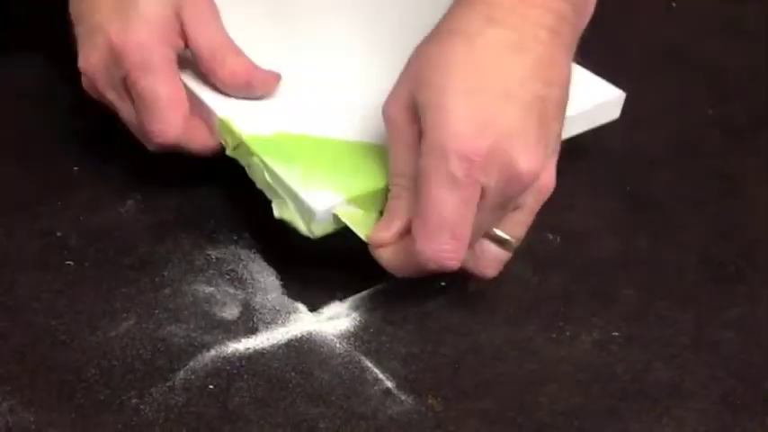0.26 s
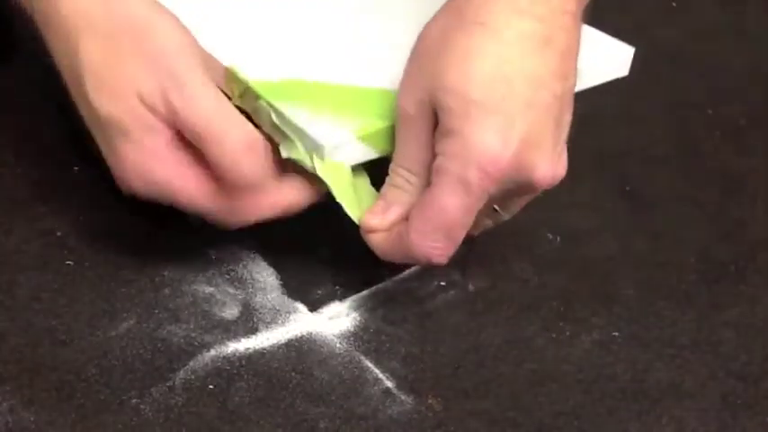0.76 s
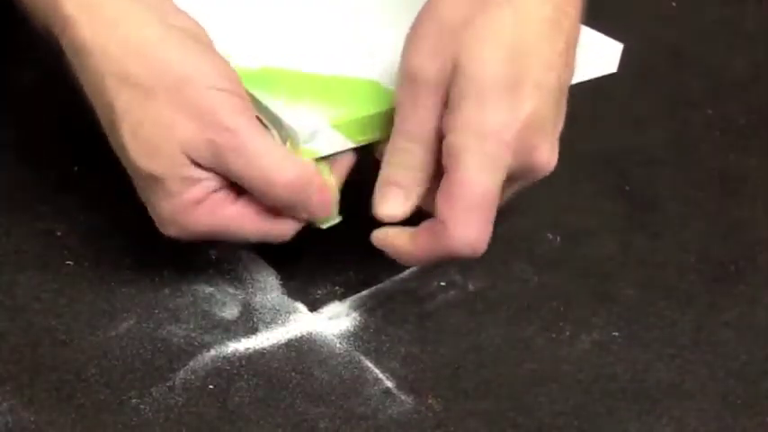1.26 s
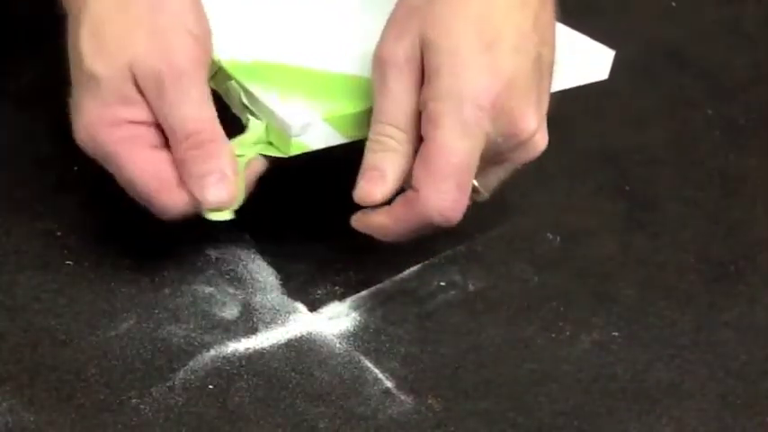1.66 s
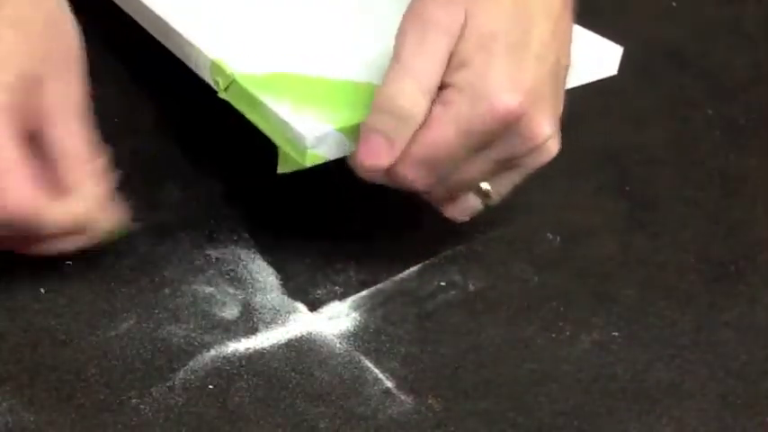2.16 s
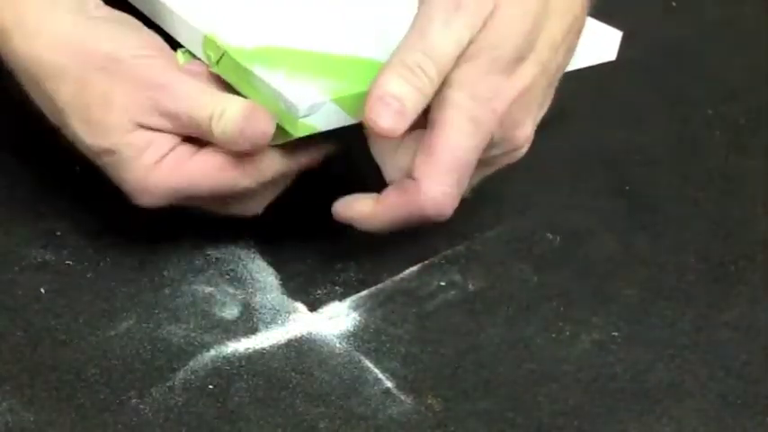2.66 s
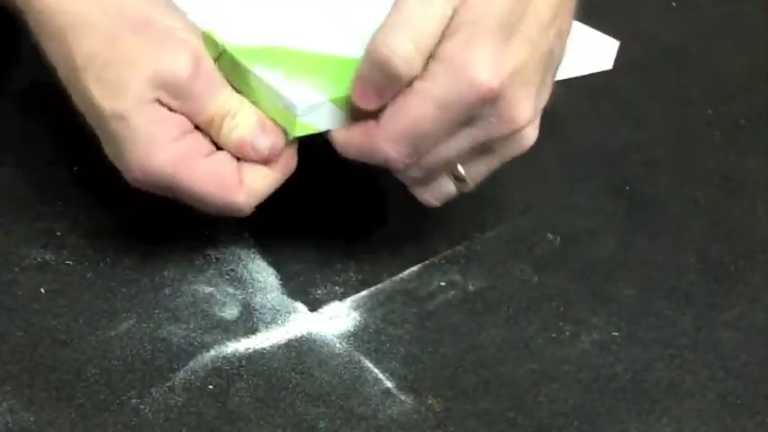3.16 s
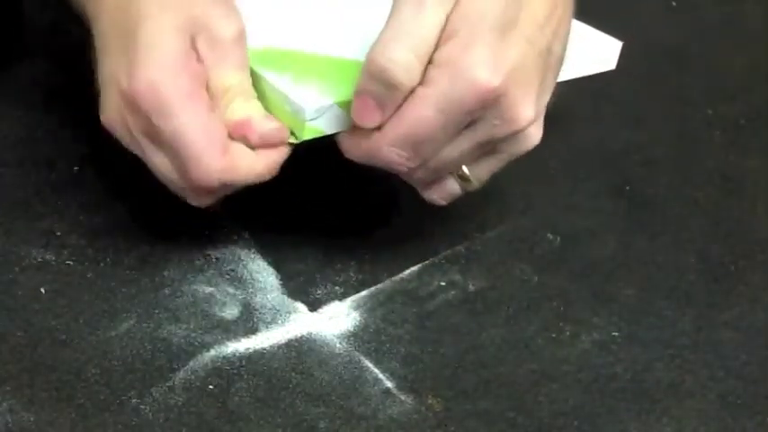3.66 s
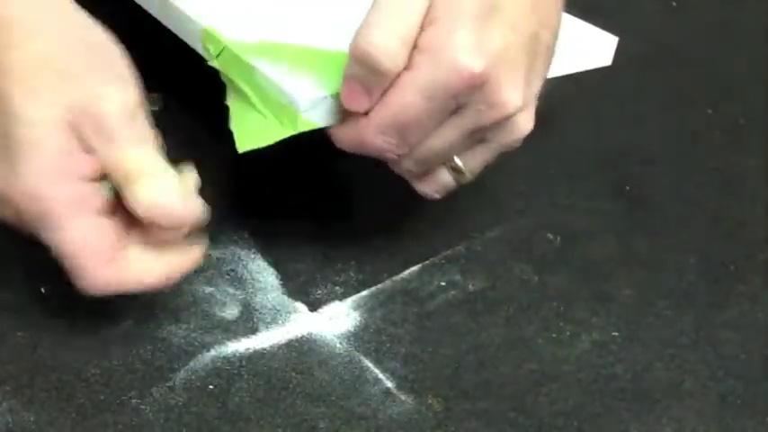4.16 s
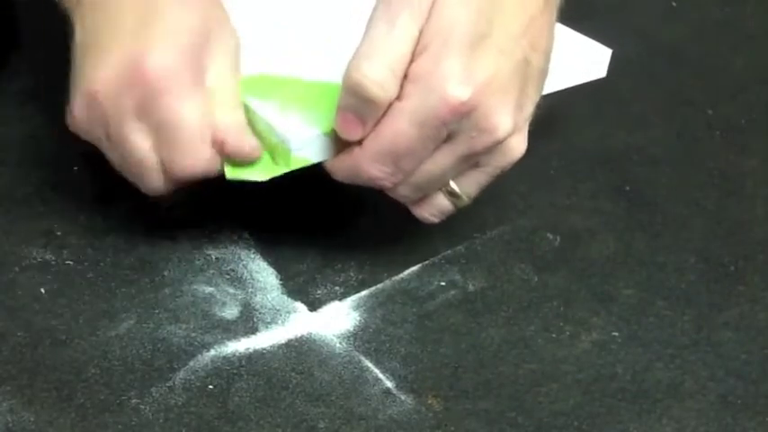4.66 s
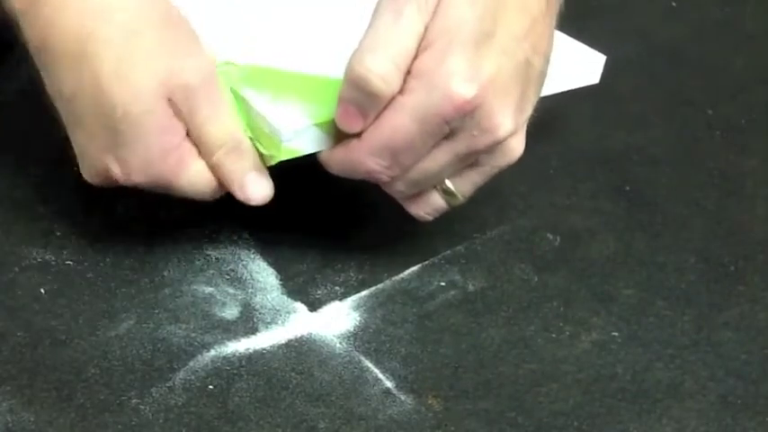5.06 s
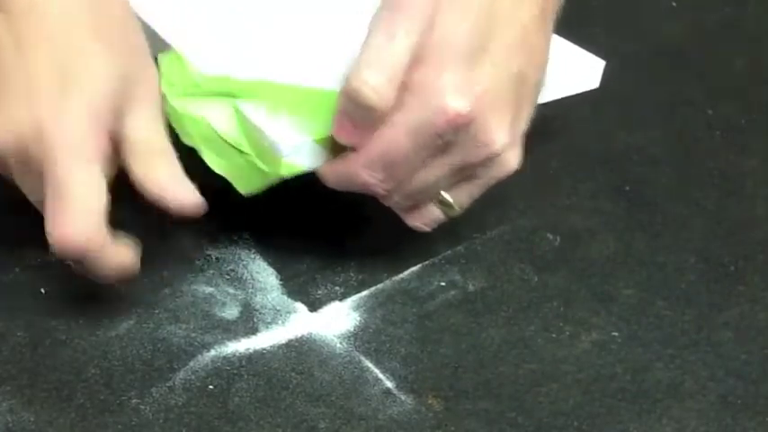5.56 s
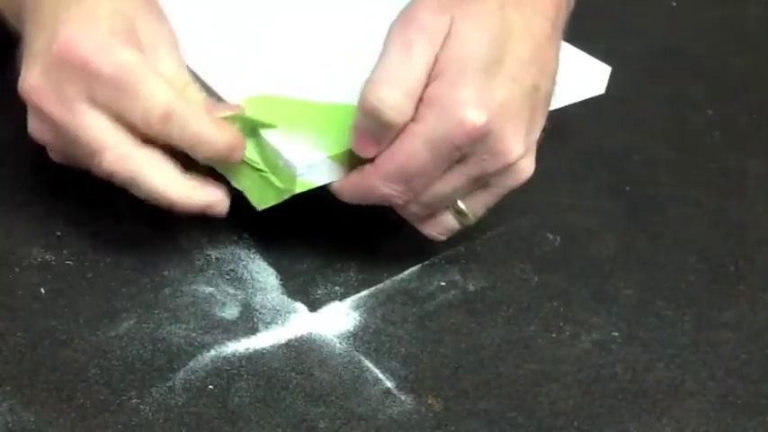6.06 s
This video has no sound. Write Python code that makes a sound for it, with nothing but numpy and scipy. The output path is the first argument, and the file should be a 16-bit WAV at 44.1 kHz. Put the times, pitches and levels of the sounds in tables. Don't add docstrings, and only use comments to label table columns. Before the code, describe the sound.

Close, crisp tape tearing: one bright rip, then clusters of hard snapping cracks thinning to soft crackle, over quiet workshop hum.

```python
import sys
import numpy as np
from scipy import signal
from scipy.fft import rfft, irfft
from scipy.io import wavfile
from scipy.ndimage import uniform_filter1d

SR = 44100
rng = np.random.default_rng(int(sys.argv[2]) if len(sys.argv) > 2 else 0)


def wav_record(signal):
    frames = np.transpose(np.atleast_2d(signal))
    bounded = np.clip(frames, -1, 1)
    quanta = np.round(bounded * 32767).astype(np.int16)
    wavfile.write(sys.argv[1], SR, quanta)


def field_ratio(decibels):
    return 10 ** (np.asarray(decibels, dtype=float) / 20)


N = 278712
FADE_DB = 20.0


def evened(x):
    return x / np.sqrt(np.mean(x ** 2) + 1e-20)


def unit(x):
    return x / np.linalg.norm(x)


def read(points, hz):
    f, value = np.transpose(points)
    return np.interp(np.log(hz + 1), np.log(f + 1), value)


def add(mix, s, sound):
    part = mix[max(round(s * SR), 0):][:len(sound)]
    part += sound[:len(part)]


def coloured(x, points):
    gain = field_ratio(read(points, np.fft.rfftfreq(len(x), 1 / SR)))
    return evened(irfft(rfft(x) * gain, len(x)))


def causal(x, points):
    log_gain = np.log(field_ratio(read(points, abs(np.fft.fftfreq(4096, 1 / SR)))))
    response = np.fft.ifft(np.exp(np.conj(signal.hilbert(log_gain)))).real[:2048]
    return signal.oaconvolve(x, response)[:N]


def band(x, lo_hz, hi_hz):
    edges_hz = [lo_hz, min(hi_hz, SR / 2 - 99)]
    return signal.sosfilt(signal.butter(2, edges_hz, "band", fs=SR, output="sos"), x)


def ring(hz, db, t60, size):
    t = np.arange(size) / SR
    return field_ratio(db - 60 * t / t60) * np.sin(2 * np.pi * hz * t)


def crackle(per_s, spread_db):
    size = field_ratio(spread_db * np.minimum(rng.exponential(1, N), 4))
    breaks = rng.random(N) < per_s / SR
    return size * breaks * rng.standard_normal(N)


def background():
    # frequency in Hz, level in dB per Hz
    air = [(18, -63.5), (30, -75), (184, -2.5), (632, -4.5), (1010, -11.5), (1430, -8), (1630, -10.5),
           (2120, -15.5), (3870, -14), (4420, -18), (14400, -20), (16000, -19.5)]
    # frequency in Hz, width in Hz, level in dB
    fan = [
        (124, 17.6, -69),
        (191.3, 12, -68.5),
        (321.5, 4.8, -73.5),
        (967, 23, -75),
    ]
    hz = np.fft.rfftfreq(N, 1 / SR)
    tones = []
    for f, width_hz, db in fan:
        fuzzy = rfft(rng.standard_normal(N)) / (1 + (2 * (hz - f) / width_hz) ** 2)
        tones.append(field_ratio(db) * evened(irfft(fuzzy, N)))
    rumble = band(rng.standard_normal(N), 7.6, 43)
    return field_ratio(-63) * coloured(rng.standard_normal(N), air) + sum(tones) + field_ratio(-68.0) * evened(rumble)


def strokes():
    # firmest grip in seconds, level in dB, rise in seconds,
    # fall in seconds, brightness in dB
    rubs = [(0.03, -50.5, .4, 0.18, -9), (0.123, -44, 0.074, 0.061, -4.5), (0.29, -51.5, 0.54, 0.28, -8),
            (0.652, -43.5, 0.16, 0.086, -5), (0.902, -45, 0.044, 0.21, -4),
            (0.94, -48.5, 0.077, 0.089, -15), (1.236, -48.5, 0.073, 0.075, 2), (1.3, -56, 0.21, 0.16, 23),
            (1.59, -55, .03, 0.091, -15), (1.63, -49.5, 0.13, 0.016, 3.5), (3.56, -50, 0.043, 0.043, -12),
            (2.275, -51, 0.044, 0.049, -3), (2.385, -44, 0.07, 0.11, -4), (2.468, -42.5, 0.03, 0.041, -7),
            (2.6, -63, 0.072, .08, 9), (2.673, -50, 0.077, 0.035, -10.5), (2.8, -49, 0.087, 0.038, -2.5),
            (2.99, -66, 1.2, .03, -22), (3.194, -54, 0.17, 0.089, -15), (4.484, -48.5, 0.062, 0.015, -6),
            (4.591, -47.5, 0.11, 0.033, -6), (5.161, -46, 0.06, 0.04, 0), (5.8, -70.5, 2.1, 0.47, -29)]
    # hardest pull in seconds, level in dB, rise in seconds,
    # fall in seconds, brightness in dB
    pulls = [(0.43, -42.5, 0.05, 0.2, -9), (1.418, -27, 0.051, 0.045, -2.5), (1.76, -40, 0.025, .06, -4),
             (1.793, -17, 0.028, 0.045, 0), (1.835, -40, 0.082, 0.019, -13.5),
             (1.905, -46.5, 0.027, 0.091, -2), (0.485, -36.5, 0.082, 0.05, 1), (3.604, -45, .006, .08, -8),
             (2.132, -42, 0.045, 0.06, -4), (3.33, -39.5, 0.044, 0.21, -5.5),
             (3.619, -39.5, 0.016, 0.26, -7), (4.032, -40.5, 0.053, 0.096, -8),
             (4.27, -44, 0.0061, 0.097, -12), (4.716, -46, 0.055, 0.26, 3.5),
             (5.085, -43, 0.052, 0.051, -11), (5.33, -35, 0.025, 0.097, -11.5),
             (5.379, -40.5, 0.09, 0.067, 2), (5.5, -38.5, 0.042, 0.03, 4),
             (6.085, -39.5, 0.093, 0.33, -1.5), (6.199, -43, 0.13, 0.2, -7), (6.32, -51.5, 0.45, .5, -7)]
    t = np.arange(0, N + 64, 64)[:, None] / SR
    s, db, rise, fall, bright_db = np.transpose(rubs + pulls)
    fade = FADE_DB * np.maximum((s - t) / rise, (t - s) / fall)
    power = field_ratio(db - fade) ** 2 + 1e-30
    total = power.sum(1)
    brightness = power @ bright_db / total
    return [np.interp(np.arange(N) / SR, t[:, 0], v) for v in (np.sqrt(total), brightness)]


def rubbing():
    # frequency in Hz, level in dB per Hz
    paper_colour = [(300, -24.5), (900, -14), (1500, -17.5), (2200, -12.5), (3000, -9), (4000, -5.5),
                    (6700, -4.5), (9000, -5), (14700, -7.5), (16000, 1)]
    level, bright_db = strokes()
    bright = field_ratio(bright_db / 2)
    grip = field_ratio(2.4 * evened(uniform_filter1d(rng.standard_normal(N), 300)))
    paper = coloured(crackle(per_s=13000, spread_db=2.0) * grip, paper_colour)
    dull = signal.sosfiltfilt(signal.butter(2, 4300, fs=SR, output="sos"), paper)
    cup = field_ratio(-10.5) * band(paper, 1840, 3400) / bright ** 2
    return level * (dull / bright + (paper - dull) * bright + cup)


def board():
    # time in seconds, level in dB
    scrape = [(0.0, -54), (0.09, -49.5), (0.46, -59), (1.69, -60.5), (1.92, -76), (2.36, -71), (3.1, -57),
              (3.4, -55.5), (3.57, -67), (4.1, -64), (4.28, -68), (4.72, -62), (5.14, -83), (5.44, -61),
              (6.32, -59)]
    # frequency in Hz, level in dB per Hz
    bench_colour = [(60, -43), (130, -8.5), (300, -10.5), (600, -15), (1000, -10), (1800, -19),
                    (4000, -31.5)]
    # start in seconds, peak in dB, pitch in Hz, t60 in seconds
    knocks = [(0.009, -43, 175, 0.036), (0.173, -33, 463, 0.1), (0.189, -45.5, 553, 0.53),
              (1.872, -37.5, 970, 0.024), (2.617, -41, 626, 0.075), (3.335, -37.5, 950, 0.094),
              (4.29, -33, 640, 0.18), (4.327, -35.5, 844, 0.054), (4.337, -29.5, 265, 0.037),
              (4.36, -39, 560, 0.1), (6.076, -39, 840, 0.088)]
    # start in seconds, peak in dB, pitch in Hz, t60 in seconds
    thumps = [
        (1.386, -41, 124, 0.21),
        (3.334, -39.5, 190, 0.12),
        (4.678, -50, 120, 0.15),
        (4.743, -46.5, 135, 0.21),
        (0.174, -42, 160, .15),
        (3.622, -44, 180, .12),
        (2.1, -52.5, 110, 0.11),
    ]
    s, db = np.transpose(scrape)
    scrape_level = field_ratio(np.interp(np.arange(N) / SR, s, db) - 4)
    out = scrape_level * coloured(crackle(per_s=770, spread_db=1.5), bench_colour)
    t = np.arange(6000) / SR
    blows = knocks + thumps
    chance = rng.standard_normal((len(blows), 6000))
    for (s, db, hz, t60), noise in zip(blows, chance):
        thud = band(noise * field_ratio(-60 * t / t60), hz * 0.46, hz * 1.89)
        add(out, s, field_ratio(db) * thud / abs(thud).max())
    return out


def releases():
    # start in seconds, energy in dB,
    # ring of the free strip in Hz, share into the board in dB, brightness in dB
    tape_snaps = [(3.2944, -14, 8500, -3, 3), (3.3348, -5, 9200, 3.5, -19), (3.4076, -14, 4750, -0.5, -1),
                  (3.6027, -18, 3120, -12, 4), (3.6218, 0, 4140, 14, 7), (3.6245, 1, 2570, 10.5, 0),
                  (3.682, 7.5, 4150, 2, -2), (3.7358, 3.5, 3840, 5.5, -16), (3.7376, 2.5, 3920, 11.5, 26),
                  (3.802, 7.5, 4160, -1.5, 10), (3.805, -0.5, 5712, -11, -4.5),
                  (4.0325, -9, 10200, 11.5, -23), (4.0565, -3.5, 3550, 16, -22),
                  (4.0584, -8.5, 5470, 10, -3), (4.268, -10, 2350, 15, -38), (4.275, -12.5, 1730, 20, -33),
                  (4.7373, -11.5, 2130, 19.5, -27), (4.7505, -6.5, 1980, 8, -5),
                  (4.753, -4.5, 10400, 11.5, 1), (4.9118, -3, 8800, 4.5, 7.5), (5.4975, -16, 3680, -3, -3),
                  (5.4997, -6, 5900, 8, -2), (5.5046, 5.5, 2810, 13, 2.5), (5.5071, -8, 4150, 7, -29),
                  (5.5591, -8, 3530, 5, -6.5),
                  (1.2438, -13.5, 9287, 2, -1), (3.007, -20, 11500, 7, 5), (3.043, -23.5, 11410, 2, 21),
             (3.107, -25, 10380, 11, 20), (3.2967, -19.5, 4830, 7, -19), (3.3509, -17.5, 11100, 0, -25),
             (3.4247, -22.5, 3520, 4, -0.5), (3.4317, -22.5, 3400, -10, 0), (3.731, -16, 10340, -10, 5),
             (4.062, -10, 2470, -9, -13), (4.7095, -18.5, 9430, 4, 9.5), (4.918, -22, 9600, -2, -3),
             (4.929, -11, 5500, 6, 4.5), (4.9551, -16.5, 9500, 7, -9), (4.963, -14.5, 2330, -1, -40),
             (5.053, -26, 4750, 13, -3), (5.086, -14, 3480, -1, -5), (5.1102, -13, 3200, -6, -3),
             (5.1204, -18, 8050, -23, -5), (5.4821, -11, 8700, -1, 1), (5.939, -26.5, 4330, 4, -26),
             (5.988, -24, 2700, 13, 0), (6.0421, -19.5, 10600, -11, 5)]
    # start in seconds, energy in dB, ring in Hz, board share
    # in dB
    small_gives = [(0.0055, -26, 6100, 20), (0.02, -36, 5500, -3), (0.032, -32, 5990, -3),
                   (0.125, -28, 4100, -5), (5.445, -33, 9000, -10), (0.647, -24.5, 3480, 13),
                   (1.237, -15.5, 9000, -14), (1.28, -30, 9350, -7), (1.311, -24, 7970, 1),
                   (1.615, -32, 5630, 8), (1.649, -27.5, 13780, 12), (2.3323, -28.5, 9800, -2),
                   (2.389, -20.5, 6000, 5), (2.6196, -25.5, 2450, 21), (4.1903, -36, 6450, -4),
                   (4.6444, -30, 7750, -8), (4.6615, -24.5, 8660, -8), (5.1676, -25.5, 3300, -18),
                   (5.227, -28.5, 6100, -7), (5.2842, -32, 5430, -9), (6.0194, -29, 4050, -2),
                   (1.162, -35, 13300, -5), (1.5893, -31, 5530, 3), (2.523, -35, 6000, -4),
                   (2.982, -41, 11000, 8), (3.125, -31, 8000, 12), (3.147, -31, 6940, -3)]
    # start in seconds, energy in dB, ring in Hz,
    # brightness in dB
    glue_slips = [(0.4214, -12.5, 8360, 7), (0.4247, -19, 10850, 0), (0.4433, -8.5, 8440, -5.5),
                  (0.445, -14, 3960, -4), (0.4533, -8, 4130, -2.5), (0.4642, -1, 2560, -4.5),
                  (0.4661, -8.5, 6340, -12), (0.4717, -13, 4930, 0), (0.4823, -14.5, 6370, -13),
                  (0.4862, -6, 9990, 2), (0.4899, -7.5, 13950, 1), (0.496, -20, 9390, 0),
                  (1.3736, -8, 8000, 1.5), (1.3764, -12, 10770, -8), (1.3873, -15, 10160, 1),
                  (1.3888, -6, 7150, -4.5), (1.3898, -15, 3880, -8), (1.3966, -7, 5830, -3),
                  (1.4019, -6, 12500, -9), (1.4098, -11, 2900, -11), (1.4133, -2, 2760, -4.5),
                  (1.4151, -9, 2580, 7.5), (1.417, -4, 2780, -5), (1.4201, -5.5, 2900, -13),
                  (1.4251, -6, 5250, -8), (2.115, -20, 2500, -7), (2.1212, -22, 2440, -5),
                  (2.1402, -23.5, 6230, -4), (2.1453, -32, 5860, 1), (3.1684, -12.5, 12800, -2),
                  (3.173, -14.5, 11600, 17), (3.1748, -17, 11460, 1), (5.3164, -28, 8960, -1),
                  (5.3193, -7, 8350, 4.5), (5.3244, -10.5, 3050, -1.5), (5.3276, -9.5, 5830, 4),
                  (5.3309, -22, 2860, -7), (5.3407, -25, 2840, -6), (5.345, -21, 5860, 7),
                  (5.3518, -8, 8700, 6), (5.3535, -13, 8700, 12), (5.3611, -16, 8700, 1),
                  (5.375, -28, 8100, 2), (5.4731, -25, 8700, -3), (5.4776, -22, 3880, -6),
                  (1.7147, -30, 3010, -6), (1.7172, -10.5, 8790, 12), (1.7259, -19, 5940, 4),
                  (1.7307, -17, 13700, 8), (1.732, -6.5, 9100, 12), (1.746, -0.5, 13400, 8.5),
                  (1.752, -11, 9470, 10), (1.754, -3, 11800, 13), (1.7577, -7, 9600, 11),
                  (1.76, -2, 10160, 16), (1.7667, -5, 13260, 7), (1.7711, -2, 6460, 5),
                  (1.7776, 1, 6500, 1), (1.7832, -3, 6720, 7), (1.7871, 1, 6550, -6), (1.7897, 4, 6770, 4),
                  (1.7943, 4.5, 6800, -0.5), (1.8054, -6, 11110, 0), (1.8086, -2, 10160, -2),
                  (1.813, -10, 8100, 11), (1.8153, -5.5, 9910, -1), (1.8213, -9, 11890, 9),
                  (1.8247, -10, 13520, 0), (1.8347, -11, 11630, -2), (1.8378, -17, 13780, -5),
                  (1.841, -12, 13780, -2), (1.843, -16, 13870, 4), (1.8456, -16, 13180, 6),
                  (1.896, -13, 8610, 10), (1.899, -25, 8790, 0), (1.9037, -14.5, 8100, 3),
                  (1.9064, -22, 4770, -2), (1.9127, -21, 8790, -5), (6.083, -17.5, 3240, -16),
                  (6.0895, -22, 3360, -4), (6.0937, -17, 4070, -2), (6.101, -19, 10080, 4),
                  (6.107, -18.5, 3550, -10), (6.1116, -24, 3700, -3), (6.1187, -26, 3880, 0),
                  (6.136, -27, 6720, 0), (6.1453, -27, 3700, -3), (6.1549, -29, 3450, 0),
                  (6.1571, -18, 3790, -1), (6.16, -23, 3620, -3)]
    ticks = [(s, db, hz, board_db, 2 + 0.5 * np.log2(hz / 5000)) for s, db, hz, board_db in small_gives]
    slips = [(s, db - 2.5, hz, -1.5 - 0.31 * bright_db, bright_db + 2)
             for s, db, hz, bright_db in glue_slips]
    return tape_snaps + ticks + slips


def snaps():
    # frequency in Hz, level in dB, t60 in seconds
    board_modes = [(571, 4, 0.03), (710, 1.5, 0.013), (837, 3, 0.055), (990, 14, 0.021), (1273, 7, 0.03),
                   (1650, 2.5, 0.022)]
    size = 3000
    near, spread, t = np.zeros(N), np.zeros(N), np.arange(size) / SR
    rows = releases()
    chance = rng.standard_normal((len(rows), size + 2 * len(board_modes)))
    lead_s = 0.0003
    pop = np.arange(size) == round(lead_s * SR)
    rise = np.minimum(t / 0.0002, 1)
    for (s, db, hz, board_db, bright_db), z in zip(rows, chance):
        release = z[:size] * np.exp(-t / 0.0005) * rise + 1.3 * pop
        width = field_ratio(0.5 * np.clip(board_db, -20, 3))
        threads = width * z[size - 1::-1] * np.exp(-t / 0.0024) * rise
        burst = release + 1.4 * pop + 0.22 * threads

        strip = unit(band(release + 5 * pop, hz * 0.87, hz * 1.156))
        edge_hz = 7500 * field_ratio(0.13 * min(bright_db, 0))
        low_hz = 1900 * field_ratio(0.5 * np.clip(bright_db, -8, 14))
        crack = unit(band(band(burst, low_hz, edge_hz), low_hz * 0.88, 13000.0))
        spit = field_ratio(bright_db + 1.5) * unit(band(release + 0.8 * pop + 0.8 * threads, 7000, 17000))

        modes = sum(ring(f * (1 + 0.016 * detune), d + 2 * favour, t60, size)
                    for (f, d, t60), (detune, favour) in zip(board_modes, z[size:].reshape(-1, 2)))
        shaken = unit(band(signal.fftconvolve(burst, modes)[:size], 395, 2240))
        wood = field_ratio(board_db - 14.0) * shaken

        gain = field_ratio(db) / np.sqrt(1.5 + spit @ spit) / np.hypot(1, field_ratio(board_db - 14.5))
        add(near, s - lead_s, gain * (field_ratio(1.0) * strip + crack + spit + 1.5 * wood))
        add(spread, s - lead_s, gain * (field_ratio(-3) * strip + crack + spit + 1.52 * wood))
    return near, spread


def folds():
    # loudest moment in seconds, level in dB, rise in seconds, fall in seconds,
    # pitch in Hz
    sung_folds = [(0.13, -50, 0.066, .02, 6500), (0.68, -58, .02, 0.024, 1540),
                  (0.91, -53.5, 0.031, 0.096, 2050), (0.97, -60, 0.065, 0.062, 2900),
                  (1.416, -35, 0.015, .025, 2160), (1.725, -53, .012, 0.033, 2550),
                  (3.175, -45, 0.016, .03, 1090), (4.05, -45, .01, .01, 3900),
                  (4.075, -48, .01, 0.058, 2200), (4.035, -46, .002, 0.019, 620),
                  (4.059, -30, .002, 0.021, 623), (4.062, -37, 0.0036, 0.046, 825),
                  (4.914, -43.5, 0.0024, 0.02, 660), (4.739, -31, 0.0056, 0.015, 623),
                  (3.627, -33, 0.0035, 0.021, 2500), (3.56, -50.5, .025, 0.034, 3260),
                  (0.928, -55, .04, 0.082, 2700), (3.34, -40, .004, 0.035, 4600),
                  (3.61, -43, .008, 0.025, 3300), (4.28, -39, .008, 0.037, 970),
                  (5.13, -54, .03, .06, 3200), (2.62, -48.5, .003, 0.036, 590),
                  (3.686, -32.5, 0.0035, 0.023, 1470), (1.795, -42, 0.021, 0.0098, 970),
                  (0.78, -63, 0.082, 0.059, 3800), (0.65, -56, 0.043, .03, 3500),
                  (5.51, -41.5, .006, 0.028, 1940), (5.749, -71, 0.27, .3, 2600),
                  (6.19, -47.5, 0.074, 0.16, 3350), (6.31, -52, 0.05, .1, 4100)]
    half = SR // 2
    out, t = np.zeros(N), np.arange(-half, half) / SR
    grain = np.pad(crackle(per_s=4300, spread_db=3.5), half, "reflect")
    for s, db, rise, fall, hz in sung_folds:
        at = round(s * SR)
        sung = evened(band(grain[at:at + SR], hz * 0.83, hz * 1.16))
        swell = field_ratio(db - FADE_DB * np.maximum(-t / rise, t / fall))
        sound = swell * sung[:len(t)]
        add(out, s - 0.5, sound[max(half - at, 0):])
    return out


def shop(x):
    # frequency in Hz, t60 in seconds
    decay = [(200, 0.44), (800, 0.15), (2500, 0.15), (6000, 0.14), (14000, 0.1)]
    out, phase = np.zeros(N), np.arange(N) / SR * 2 * np.pi * 7
    for k in range(3):
        hz, t, z = signal.stft(rng.standard_normal(SR // 2), SR, nperseg=128)
        dying = z * field_ratio(-60 * t / read(decay, hz)[:, None])
        tail = signal.istft(dying, SR, nperseg=128)[1]
        tail = unit(tail * np.minimum(np.arange(len(tail)) / SR / 0.00086, 1))
        turning = np.sqrt(2 / 3) * np.cos(phase + k * np.pi / 3)
        out += signal.fftconvolve(x * turning, tail)[:N]
    return field_ratio(-8.5) * out


def scene():
    # frequency in Hz, gain in dB
    shadow = [(1500, -0.5), (2100, -9), (2700, 1), (4300, 2), (4720, -11), (5050, 2), (11000, 0.5),
              (14500, -4.5)]
    near, spread = snaps()
    near = causal(near, shadow)
    hands = rubbing() + folds() + board()
    bench = field_ratio(-11.5) * np.roll(near, round(0.003 * SR))
    room = shop(causal(spread, shadow) + hands)
    return (near + bench + hands + room + background())[None]


def band_limit(x):
    return signal.sosfilt(signal.butter(12, 16610, fs=SR, output="sos"), x)


def record(dry):
    # frequency in Hz, gain in dB
    body = [(1500, 0), (2050, 0.5), (2600, -0.5), (4300, -1), (4750, 0), (5200, 1)]
    x = 0.68 * np.tanh(dry / 0.68)
    x = irfft(rfft(x) * field_ratio(read(body, np.fft.rfftfreq(N, 1 / SR))), N)
    x = signal.sosfilt(signal.butter(3, 95.0, "high", fs=SR, output="sos"), x)
    edge = signal.firwin(255, 15300, window=("kaiser", 6), fs=SR)
    low = signal.oaconvolve(x, edge[None], "same")
    return band_limit(low + field_ratio(-47.5) * (x - low))


dry = scene()
out = record(dry)
wav_record(out)
```